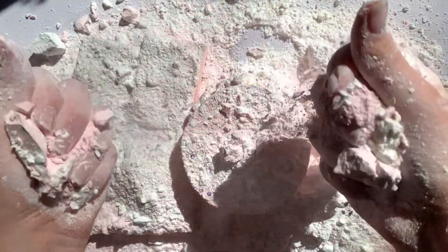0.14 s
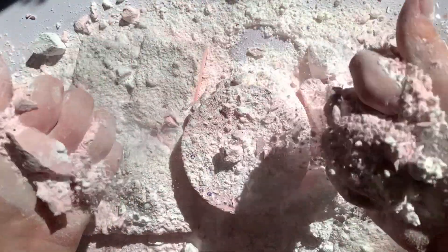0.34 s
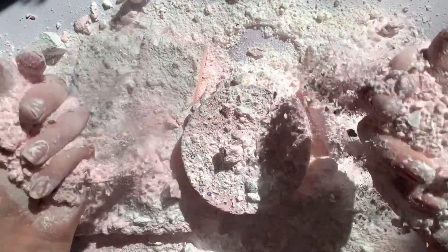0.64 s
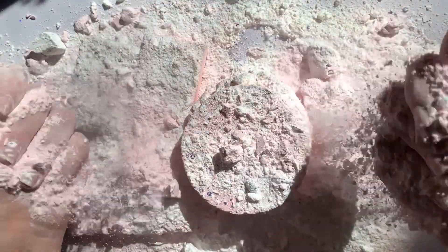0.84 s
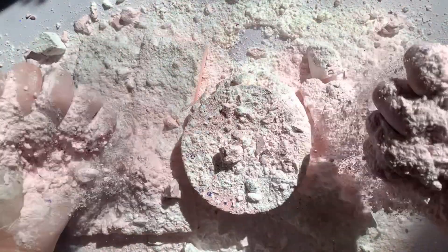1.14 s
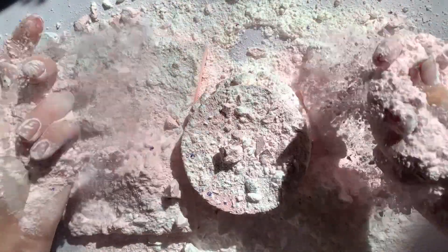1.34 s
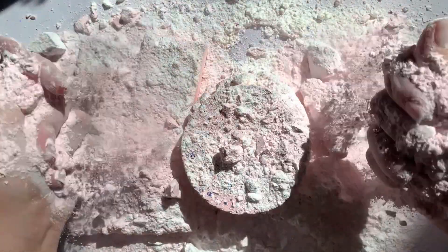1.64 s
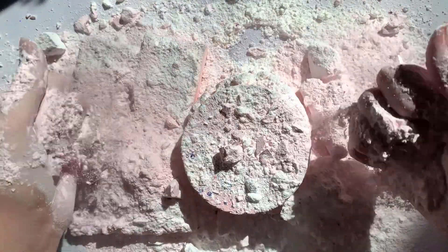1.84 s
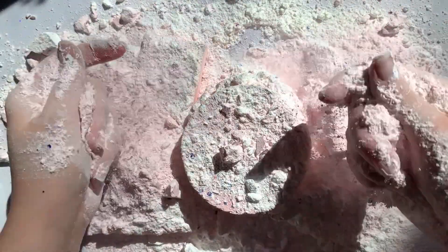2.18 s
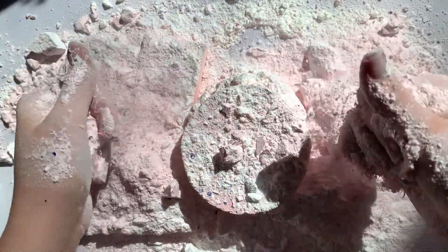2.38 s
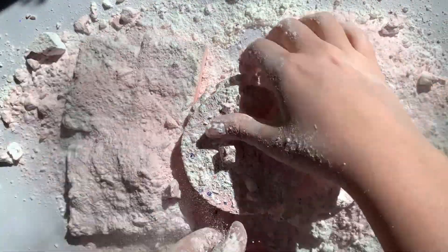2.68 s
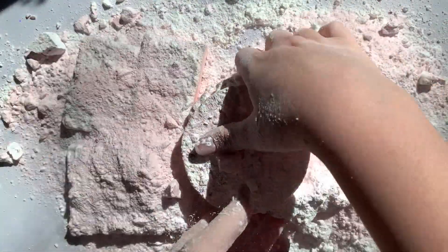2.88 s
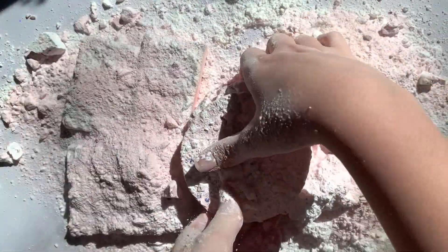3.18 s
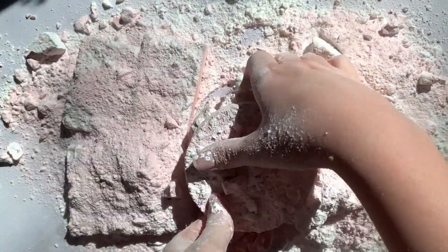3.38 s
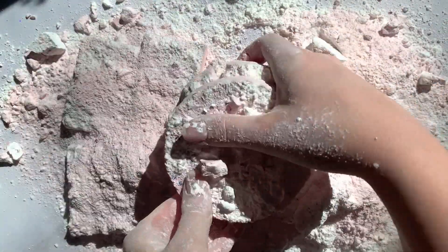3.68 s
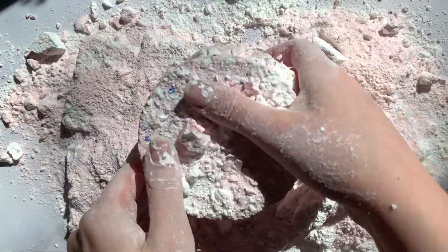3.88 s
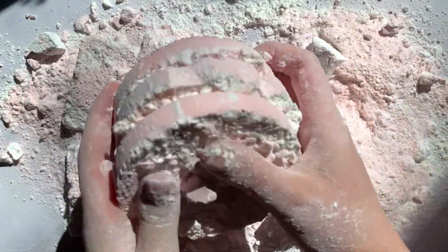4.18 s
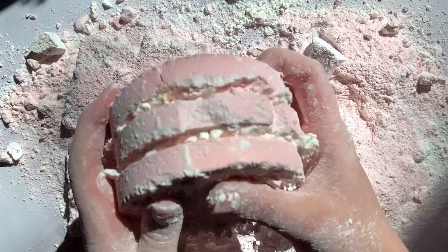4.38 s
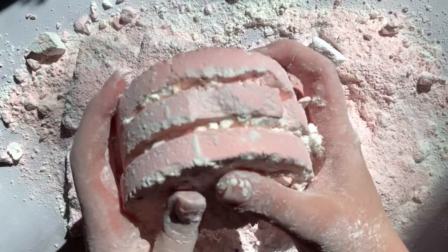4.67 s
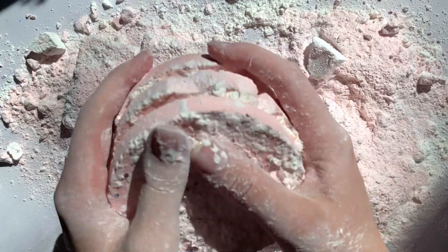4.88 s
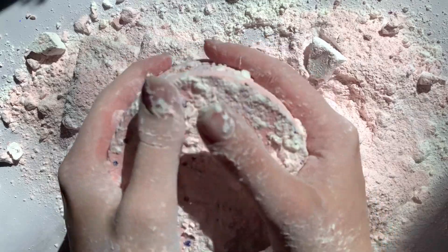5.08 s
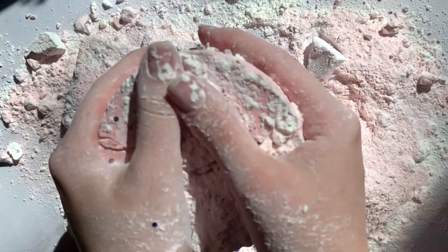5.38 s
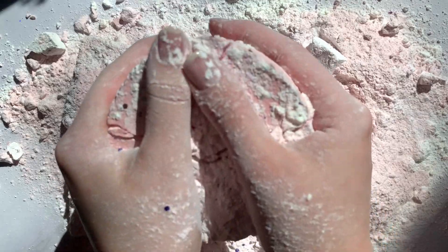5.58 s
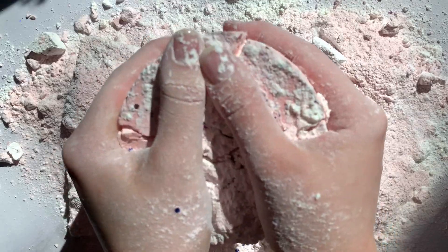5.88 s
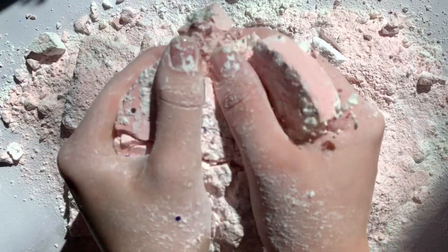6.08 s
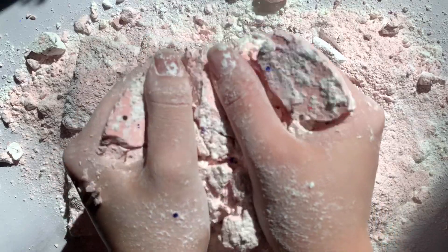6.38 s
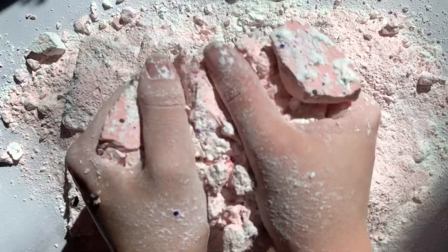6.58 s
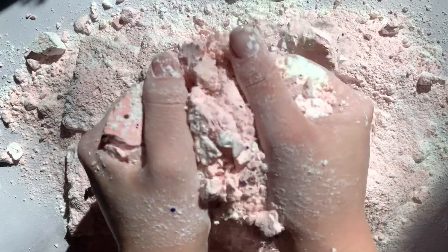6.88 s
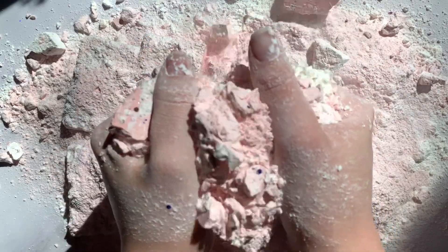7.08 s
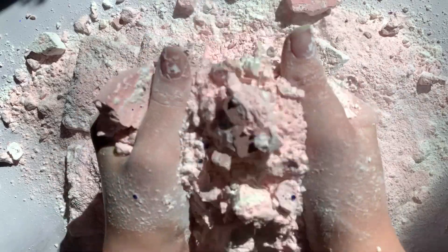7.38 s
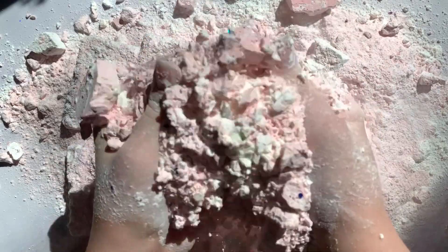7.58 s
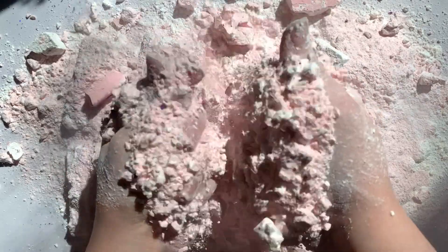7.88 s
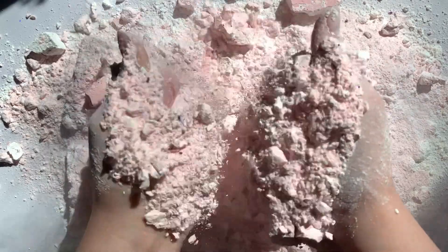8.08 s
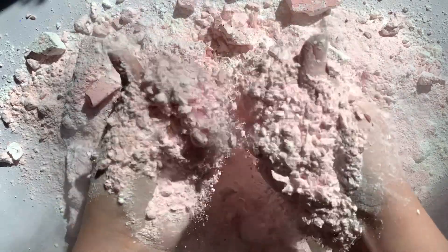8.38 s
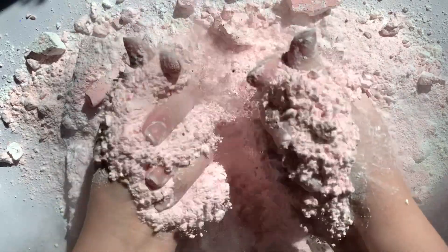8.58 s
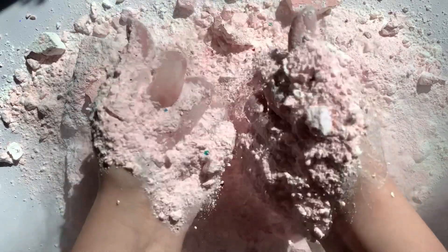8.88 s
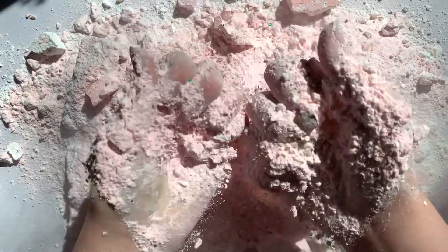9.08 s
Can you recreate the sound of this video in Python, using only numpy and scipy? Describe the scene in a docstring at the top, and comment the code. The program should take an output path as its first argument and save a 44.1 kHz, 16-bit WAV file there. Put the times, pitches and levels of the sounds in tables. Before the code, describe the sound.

Very close stereo sound of hands crushing dry chalk indoors. Sharp brittle cracks and gritty crumbling come first and thin out within two seconds. Fingers brush softly through powder with a few small clicks. Then a block gives way in rapid, dense snapping and crunching, loosening into duller lumps and crumbs before nearly stopping. Faint low ventilation rumble, hum and hiss lie underneath.

```python
"""Sharp cracks and crumbling chalk come first, kneaded by two hands close under a phone with two microphone ports.
Fingers then brush the dust, and a long hard crush into grit and powder thins out towards the end.
Cracks are swelling noise bursts with short ringing modes; crumbling and brushing are coloured grainy noise;
lumps and small pops are damped sines. The heap groans low, over room rumble, wavering hum lines and hiss.
Table levels are set at the source, ahead of the ports, the echoes and the phone's own response."""
import sys
import numpy as np
from scipy import signal
from scipy.fft import rfft, irfft, next_fast_len
from scipy.io import wavfile
from scipy.ndimage import uniform_filter1d, map_coordinates

SR = 44100
rng = np.random.default_rng(int(sys.argv[2]) if len(sys.argv) > 2 else 0)


def int16_out(signal):
    """Quantize to a 16-bit WAV file."""
    q = np.round(np.clip(np.atleast_2d(signal).T, -1, 1) * 32767)
    wavfile.write(sys.argv[1], SR, q.astype(np.int16))


N = 407466


def amp(db):
    """dB to gain."""
    return 10 ** (np.asarray(db) / 20)


def unit(x):
    """Scaled to rms 1."""
    return x / np.sqrt(np.mean(x ** 2) + 1e-20)


def along(points, hz):
    """Read (frequency, value) points on a log frequency axis."""
    f, v = np.transpose(points)
    return np.interp(np.log(hz + 1), np.log(f + 1), v)


def curves(rows):
    """One value per sample for each column after the time."""
    s, *cols = np.transpose(rows)
    return [np.interp(np.arange(N) / SR, s, c) for c in cols]


def wobble(rate):
    """A smooth random curve of rms 1, with rate knots a second."""
    knots = rng.standard_normal(int(N * rate / SR) + 4)
    return unit(map_coordinates(knots, [np.arange(N) * rate / SR]))


def filtered(x, response):
    """x times a complex response of frequency."""
    m = next_fast_len(N + 8192)
    return irfft(rfft(x, m) * response(np.fft.rfftfreq(m, 1 / SR)), m)[..., :N]


def coloured(envelope, spectrum, patchy_db=0):
    """Two unrelated noises under one envelope; patches of gain give each moment its own shade of the colour."""
    z = signal.stft(rng.standard_normal((2, N)), nperseg=256)[2]
    field = rng.standard_normal(z.shape[1:])
    for axis in (0, 1):
        field = uniform_filter1d(field, size=3, axis=axis)
    patched = z * amp(patchy_db * unit(field))
    pair = unit(signal.istft(patched, nperseg=256)[1][:, :N])
    # the colour shapes the noise; its mean power over the band is divided out
    norm = np.sqrt(np.mean(amp(along(spectrum, np.linspace(0, SR / 2, 4000))) ** 2))
    return filtered(envelope * pair, lambda hz: amp(along(spectrum, hz)) / norm)


def burst(t, rise, t60):
    """A quick swell that dies away; rise and t60 share the unit of t."""
    return (1 - np.exp(-t / rise)) * amp(-60 * t / t60)


def crumbs(count, rise, t60, spread_db):
    """The envelope of many small random fractures, a few of them larger."""
    draw = rng.random((count, 2))
    # stress builds up again after each break, so gaps are fairly even
    when = (np.arange(count) + draw[:, 0]) / count
    size = amp(-spread_db * np.log(1 - draw[:, 1]))
    train = np.bincount((when * N).astype(int), size, N)
    return unit(signal.fftconvolve(train, burst(np.arange(2000) / SR, rise, t60))[:N])


# Colour of the ventilation rumble: (frequency [Hz], level [dB])
RUMBLE_COLOUR = [(12, -51), (20, -43), (40, -5), (59, 1.5), (92, -6), (205, -7), (293, -22.5), (401, -24.5),
                 (445, -23.5), (474, -24.5), (516, -32), (871, -35), (1930, -65), (3000, -72.5),
                 (3900, -64), (6600, -120)]
# Colour of the microphone hiss: (frequency [Hz], level [dB])
HISS_COLOUR = [(1500, -45), (3000, -38), (6000, -12), (8500, -26), (11500, 1), (14000, 12), (15500, 9),
               (17000, -37)]
# Wavering hum lines of the room: (frequency [Hz], width [Hz], level [dB])
HUM_LINES = [(60.3, 7.3, -65.5), (120.2, 8, -61), (203.4, 7.1, -72)]


def room():
    """Low ventilation rumble with a few wavering lines of narrow noise, and the hiss of the microphones."""
    sound = coloured(amp(-54.0 + wobble(2.28)), RUMBLE_COLOUR)
    sound = sound + coloured(amp(-72.5 + 1.5 * wobble(5)), HISS_COLOUR)
    for hz, width, db in HUM_LINES:
        line = filtered(rng.standard_normal((2, N)), lambda f: np.exp(-((f - hz) / width) ** 2))
        sound = sound + amp(db) * unit(line)
    return sound


# Force of the hands, also played by pops() and crumbling():
# (time [s], crumbling lumps level [dB], grit level [dB], graininess [dB])
HAND_FORCE = [(0.0, -57, -53.5, -22), (0.37, -61, -55, -6), (0.6, -55.5, -53.5, 4), (0.68, -51, -48.5, -1),
              (0.77, -54.5, -54.5, 1), (0.83, -60, -58.5, -3), (0.99, -66.5, -66, 0),
              (1.015, -59, -49.5, 7), (1.06, -62, -58, 0), (1.12, -62.5, -60, -3), (1.33, -63.5, -62, -9),
              (1.55, -62.5, -57, -11), (1.75, -69, -82, 3), (1.85, -84.5, -75, -9), (5.1, -91, -84.5, 1),
              (5.27, -60, -72, 7), (5.34, -69, -52, 23), (5.42, -55, -46, 11), (5.52, -66, -56, 5),
              (5.7, -65, -50.5, 17), (5.79, -59, -50, 16), (5.84, -54, -37, 8), (5.9, -67, -55, 15),
              (5.97, -56, -36.5, 2), (6.07, -48, -37.5, 7), (6.11, -54, -45, 4), (6.17, -38, -36, 3),
              (6.21, -54, -46.5, 9), (6.27, -38.5, -38, 13.5), (6.33, -44.5, -38.5, 4),
              (6.48, -44.5, -43, -1), (6.54, -41.5, -36, 4), (6.62, -44.5, -41, 2), (6.82, -42.5, -43, 10),
              (6.9, -44.5, -43.5, 5), (6.93, -43, -40, 1), (6.98, -46.5, -45.5, -9), (7.03, -42, -45.5, -3),
              (7.15, -44.5, -45.5, 3.5), (7.24, -47, -50.5, 0.5), (7.45, -43, -48.5, -10),
              (7.6, -45.5, -51, 0), (7.69, -55.5, -63, 11.5), (7.75, -41, -50, -5), (7.83, -51, -54, 4),
              (7.9, -45.5, -47.5, -2), (8.05, -45.5, -47, 1), (8.15, -54, -54.5, 2), (8.28, -51.5, -58, -1),
              (8.4, -65.5, -63.5, 8), (8.55, -55.5, -58, -8), (8.67, -48, -57, -7), (8.85, -51, -62.5, 2),
              (9.0, -56.5, -65, -10), (9.14, -60.5, -66, 6), (9.17, -66, -68, -6), (9.24, -71, -70, -3)]
# Colour of the groaning heap: (frequency [Hz], level [dB])
HEAP_COLOUR = [(30, -70), (70, -12.5), (120, -10), (200, -1.5), (350, -15.5), (700, -29), (1500, -68)]
HARD_DB = -42  # crumbling at full force
HEAP_DB, HEAP_FOLLOWS = -49, 0.78  # groan at full force [dB]; change per dB of crumbling


def pressing():
    """The packed heap shifts in low irregular jolts, the louder the harder the chalk is crumbled."""
    lumps_db, grit_db, _ = curves(HAND_FORCE)
    force_db = (lumps_db + grit_db) / 2 - HARD_DB
    return coloured(amp(HEAP_DB + HEAP_FOLLOWS * force_db + 4.0 * wobble(30)), HEAP_COLOUR)


# Fingers brushing over powder, powder sifting down:
# (time [s], length [s], grit level [dB], lumps over grit [dB], dust over grit [dB])
FINGER_RUBS = [(0.01, 0.29, -74.5, -12, 13), (1.625, 0.11, -72, 3, 3), (1.749, 0.082, -68.5, -10, 5),
               (1.848, 0.062, -77, 3, 10), (1.945, 0.078, -69, -25, 11.5), (2.026, 0.12, -76, 3, -2),
               (2.155, 0.049, -65, 2.5, 2.5), (2.218, 0.18, -79.5, 4.5, 2), (2.31, 0.12, -68.5, -25, 5),
               (2.51, 0.098, -69, 4, 0.5), (2.627, 0.17, -59, -6.5, -2), (2.73, 0.094, -59.5, -17, 8),
               (2.835, 0.17, -59, -4, -2.5), (2.985, 0.058, -77.5, 17, 10), (3.215, 0.12, -69.5, 4.5, 2),
               (3.354, 0.053, -60.5, 1.5, -3), (3.405, 0.075, -76.5, 9, -22), (3.503, 0.027, -70, 11, 16.5),
               (3.531, 0.081, -86.5, 19.5, 3), (3.66, 0.12, -80, 9.5, 2), (3.794, 0.12, -77, 10.5, 3),
               (3.897, 0.079, -74.5, 0, 11.5), (3.976, 0.065, -77, 6.5, -1), (4.053, 0.053, -78, 3, 7),
               (4.178, 0.046, -71, -1, -1), (4.266, 0.088, -77, 5, 4), (4.34, 0.053, -69.5, 1, 16),
               (4.419, 0.11, -54.5, -4, -2.5), (4.544, 0.066, -71, 1, -6), (4.681, 0.25, -68.5, -6, 14),
               (4.862, 0.13, -67, -1, 9.5), (5, 0.13, -70.5, 3.5, 5)]
RUB_ATTACK_S, RUB_RELEASE_S = 0.022, 0.028  # time for 20 dB of fade at each end
RUB_SAG_DB, RUB_UNEVEN_DB = 2.5, 2.5  # weaker at its ends than in the middle; uneven finger pressure


def rubbing():
    """Power of lumps, grit and dust stirred by each brush of the fingers: it swells, holds and fades."""
    t, power = np.arange(N) / SR, np.zeros((3, N))
    for s, length, db, coarse_db, fine_db in FINGER_RUBS:
        near = slice(max(round((s - .1) * SR), 0), round((s + length + .2) * SR))
        before = (s - t[near]) / RUB_ATTACK_S
        after = (t[near] - s - length) / RUB_RELEASE_S
        fade_db = -20 * np.maximum(0, np.maximum(before, after))
        across = np.clip(2 * (t[near] - s) / length - 1, -1, 1)  # -1 to 1 through the brush
        fade_db -= RUB_SAG_DB * (across ** 2 - .5)
        sizes_db = np.array([[coarse_db], [0], [fine_db]])
        power[:, near] += amp(db + sizes_db + fade_db) ** 2
    pressure = np.array([wobble(24.72), wobble(24.95), wobble(24.97)])
    return power * amp(2 * RUB_UNEVEN_DB * pressure)


# Lumps landing or breaking off, and, near 5.3 s, brief 2.2 kHz rings of the cracking block: (time [s], level
# [dB], pitch [Hz])
LUMP_THUDS = [(0.487, -40, 797), (0.503, -36, 197), (0.503, -28.5, 746), (0.525, -37, 610),
              (0.534, -30, 814), (0.572, -36, 208), (0.606, -34, 1430), (0.654, -32, 1000),
              (0.755, -31, 805), (0.828, -26, 3900), (0.9, -43.5, 1050), (1.012, -21.5, 2700),
              (1.234, -38, 820), (1.367, -34.5, 636), (1.674, -33.5, 495), (1.674, -39, 770),
              (2.549, -47, 850), (2.625, -44, 646), (2.633, -33, 5800), (2.665, -22, 6100),
              (2.707, -32, 173), (2.71, -38, 397), (2.942, -46, 807), (2.992, -43, 756), (3.04, -48, 423),
              (3.523, -42, 904), (3.699, -53, 1140), (3.818, -38.5, 804), (4.336, -39, 238),
              (4.416, -39.5, 730), (4.442, -36, 920), (4.448, -33.5, 1190), (4.455, -32, 174),
              (4.479, -41, 746), (4.686, -47.5, 480), (5.293, -34, 2200), (5.323, -31, 2200),
              (5.329, -32, 2200), (5.339, -29, 2250), (5.348, -32, 2190), (5.364, -26, 2240),
              (5.435, -31, 2240), (5.555, -29, 1250), (5.391, -39, 250), (5.449, -27, 700),
              (5.654, -38, 241), (5.756, -30.5, 655), (6.034, -24, 1050), (6.321, -30, 1000),
              (6.393, -30, 210), (6.399, -24.5, 1090), (6.418, -27, 1240), (6.524, -30, 188),
              (6.538, -30, 190), (6.586, -42, 180), (6.661, -29, 170), (6.452, -32, 690),
              (6.581, -25, 1310), (6.639, -24, 1260), (6.655, -26, 630), (6.697, -28, 990),
              (6.735, -24, 880), (6.813, -26, 744), (6.85, -28, 1300), (6.875, -27, 183), (6.918, -25, 905),
              (6.924, -34, 1500), (6.931, -25, 620), (6.937, -28.5, 310), (6.942, -30, 169),
              (7.023, -33, 217), (7.163, -29, 790), (7.743, -19.5, 230), (7.762, -28, 173),
              (7.85, -17, 2400), (8.558, -39, 404), (8.588, -39, 1090), (8.588, -28.5, 2370),
              (8.633, -41, 860), (8.65, -30, 810), (8.668, -35, 1010), (8.848, -37, 1220),
              (8.879, -39, 1160), (8.967, -38, 1260), (9.046, -45, 1200), (9.143, -53, 633),
              (9.198, -42, 150)]
THUD_T60, THUD_DAMPING = 0.039, 0.62  # [s] at 200 Hz; how much faster higher lumps die
THUD_RISE_CYCLES = 0.26  # soft contact


def thuds():
    """A soft lump gives a few damped cycles and a shorter overtone, nearly alike at both ports."""
    out, t = np.zeros(N + SR), np.arange(SR // 8) / SR
    for s, db, hz in LUMP_THUDS:
        t60 = THUD_T60 * (200 / hz) ** THUD_DAMPING
        tone = burst(t, THUD_RISE_CYCLES / hz, t60) * np.sin(2 * np.pi * hz * t)
        overtone = amp(5.5) * burst(t, 0.003, 0.22 * t60) * np.sin(2 * np.pi * 2.66 * hz * t)
        out[round(s * SR):][:len(t)] += amp(db) * (tone + overtone)
    trimmed = filtered(out[:N], lambda f: f ** 2 / (f ** 2 + 70 ** 2))  # little left below 70 Hz
    return trimmed * np.array([[1], [.3]])  # common and differing part


POPS, POP_HZ, POP_SPREAD = 6000, 1220, 0.34  # how many, median pitch [Hz], its log spread
POP_CYCLES, POP_SIZES_DB = 7, 2.6  # cycles to fall 60 dB; spread of sizes
POP_DB = -5.5  # under the crumbling lumps


def pops():
    """Small lumps give way one by one, each with a few cycles at its own pitch and from its own spot."""
    draw, pitch = rng.random((POPS, 3)), rng.standard_normal(POPS)
    hz = np.clip(POP_HZ * np.exp(POP_SPREAD * pitch), 300, 5000)[:, None]
    cycles = hz * np.arange(512) / SR
    size = amp(-POP_SIZES_DB * np.log(1 - draw[:, 1:2]))
    rows = size * burst(cycles, 0.94, POP_CYCLES) * np.sin(2 * np.pi * cycles)
    where = ((draw[:, :1] * N).astype(int) + np.arange(512)).ravel()
    spot = 1.67 * (draw[:, 2:] - .5)  # angle between common and differing part [rad]
    pair = [np.bincount(where, (rows * part).ravel(), N)[:N] for part in (np.cos(spot), np.sin(spot))]
    return amp(POP_DB + curves(HAND_FORCE)[0]) * unit(np.array(pair))


# Colours of the grain sizes, each (frequency [Hz], level [dB]):
# crumbling lumps, grit, fine dust (also in cracks()), and grit brushed by the fingers
LUMP_COLOUR = [(120, -20), (300, -13.5), (450, -2.5), (750, -1), (930, -4.5), (1150, -2), (1350, -4),
               (1600, -2.5), (1900, -3.5), (2200, -9), (2600, -10), (4000, -20), (7000, -56)]
GRIT_COLOUR = [(800, -82), (2000, 2.5), (3000, 2.5), (5000, -2.5), (7000, -2.5), (8500, -8), (11000, -45)]
DUST_COLOUR = [(5000, -15.5), (8000, -5.5), (9500, 1.5), (11500, -6), (13000, -2.5), (14200, 3.5),
               (15500, -7.5), (17000, -51)]
POWDER_COLOUR = [(800, -40), (1500, -15), (2650, -6), (4180, -3.5), (5030, -5.5), (6000, -4), (7600, -6),
                 (8500, -32), (11000, -42)]
DUST_DB = -3.5  # fine dust raised by crumbling, relative to the grit
GRIND_DB, GRIND_RATE = 0.5, 68  # stutter depth [dB rms], knots a second


def crumbling():
    """Chalk gives way in short fractures over a smooth powder rustle; graininess is their level over it."""
    lumps_db, grit_db, grainy_db = curves(HAND_FORCE)
    brushed = rubbing()
    crushed = amp([lumps_db, grit_db, grit_db + DUST_DB])
    # brushed lumps and dust join the crushed ones; brushed grit has its own stream
    levels = np.sqrt(crushed ** 2 + brushed * np.array([[1], [0], [1]]))
    shared = crumbs(count=800, rise=0.0003, t60=0.027, spread_db=2.5)
    grind = amp(GRIND_DB * wobble(GRIND_RATE))  # all sizes stutter together as the mass slips

    def stream(level, own, extra_db):
        """The envelope of one grain size, its swing levelled by a running rms."""
        powder = grind * amp(1.5 * wobble(35))
        swing = powder + amp(grainy_db + extra_db) * (shared + own)
        return level * swing / np.sqrt(np.abs(uniform_filter1d(swing ** 2, size=8000)))

    lump_breaks = 1.15 * crumbs(count=1500, rise=0.0012, t60=0.026, spread_db=2.6)
    lumps = stream(levels[0], lump_breaks, extra_db=-7)
    grit_breaks = 0.58 * crumbs(count=2500, rise=0.00025, t60=0.0039, spread_db=1.5)
    grit = stream(levels[1], grit_breaks, extra_db=-6)
    dust_breaks = 0.93 * crumbs(count=2500, rise=0.00025, t60=0.003, spread_db=3.0)
    dust = stream(levels[2], dust_breaks, extra_db=-2.5)
    sifted_grains = 0.6 * crumbs(count=1500, rise=0.00023, t60=0.0032, spread_db=5.0)
    sifted = stream(np.sqrt(brushed[1]), sifted_grains, extra_db=-5)

    sound = coloured(sifted, POWDER_COLOUR, patchy_db=3.0)
    sound = sound + coloured(lumps, LUMP_COLOUR, patchy_db=1)
    sound = sound + coloured(grit, GRIT_COLOUR, patchy_db=2.0)
    return sound + coloured(dust, DUST_COLOUR, patchy_db=2.5)


# Cracks of the blocks, also played by cracks():
# (time [s], reference level [dB], body over it [dB], treble over it [dB], nominal length [ms])
CRACK_EVENTS = [(0.039, -27, -25, -5, 2.1), (0.147, -25.5, -40, -7, 1.15), (0.399, -33.5, -6, -23, 1.7),
                (0.4134, -16.5, -20, -12, 1.85), (0.453, -32.5, -10.5, -8, 1.8),
                (0.502, -32, -16, -3.5, 2.7), (0.532, -25.5, -21, -29, 2.8), (0.605, -31, -12.5, -13, 3.7),
                (0.627, -31.5, -10, -15, 2.4), (0.653, -31.5, -9, -2.5, 2.7), (0.674, -17, -18, -22, 2),
                (0.698, -29, -29, -6.5, 1.8), (0.725, -32.5, -13, -3, 1.4), (0.811, -32, -21, -17, 3),
                (0.8279, -18.5, -21, -20.5, 1.4), (0.842, -34, -29, -28, 2.1), (0.9, -36.5, -14, -27, 1.9),
                (0.981, -31.5, -24, -26, 2.4), (1.0118, -18.5, -23.5, -25, 1.65),
                (1.027, -32, -24, -27, 2.3), (1.084, -36, -15.5, -33, 3.9), (1.132, -33, -13, -35, 1.6),
                (1.155, -32, -29, -22, 3), (1.196, -24, -26, -18, 1.3), (1.213, -36.5, -27, -10, 2.1),
                (1.242, -33, -26, -25, 1.8), (1.347, -33.5, -32, -26, 1.5), (1.391, -22.5, -18, -23.5, 1.6),
                (1.4274, -18.5, -19.5, -19, 1.5), (1.519, -26.5, -15.5, -19, 2.8),
                (2.157, -39, -5.5, 2.5, 0.73), (2.631, -36.5, -16, -11, 2.9), (2.645, -50, -25, 3, 1.2),
                (2.664, -25.5, -40, -10.5, 1.7), (2.687, -41.5, -21, 1, 2.2), (2.719, -47, -10, 6, 1.4),
                (2.733, -47.5, -11, 9, 3.2), (2.777, -49, -15, 10, 2), (2.865, -45.5, -38, -1, 2.8),
                (3.59, -59.5, 14.5, -35, 0.7), (3.82, -49, -9, -22, 2.6), (4.335, -42, -13.5, -7, 4),
                (4.373, -49, -31, 7, 1.3), (4.39, -44, -20, 0, 1.5), (4.415, -43, -10, -7, 1.8),
                (4.448, -39.5, -6, 0.5, 1.8), (4.461, -27.5, -16.5, -10.5, 2.5), (4.488, -42, -25, -5, 1.1),
                (4.499, -38, -32, -9, 1.1), (4.52, -33, -18, -2, 0.94), (5.207, -48.5, -8, -12, 2.6),
                (5.294, -34.5, -11, -22, 3.6), (5.322, -30, -14, -24, 4.4), (5.337, -30, -18, -12, 3.5),
                (5.347, -30, -25, -18, 6.4), (5.363, -27.5, -23, -11, 3.5), (5.396, -23, -15.5, -9.5, 1.7),
                (5.416, -39, -18, -8, 1.5), (5.426, -38, -18, -8, 1.5), (5.4345, -20.5, -19, -3, 1),
                (5.446, -19.5, -28, -13.5, 4.9), (5.485, -29, -16, -13, 2.7), (5.502, -34, -11, -13, 2.5),
                (5.534, -21.5, -16.5, -19, 1.5), (5.541, -33, -22, -8, 1.2),
                (5.5534, -19.5, -19.5, -8, 3.5), (5.58, -22, -26, -15, 2.8),
                (5.5941, -22.5, -16.5, -11, 4.5), (5.62, -17.5, -23.5, -16.5, 2.2),
                (5.636, -19, -26, -21, 2.5), (5.6549, -17.5, -16, -8.5, 2.4), (5.689, -16, -21.5, -16, 2),
                (5.716, -16.5, -25, -21, 2.2), (5.729, -14.5, -16, -10, 2.9), (5.755, -17, -19.5, -8, 2.6),
                (5.769, -21.5, -25, -12, 2.5), (5.78, -25, -19, -18, 1.7), (5.803, -14, -21, -12.5, 2.5),
                (5.816, -21, -15.5, -11, 3.9), (5.831, -18.5, -22, -11, 4.7), (5.844, -24.5, -16, -14, 3.9),
                (5.857, -21, -25, -24, 4.6), (5.875, -18.5, -14.5, -5, 1.6), (5.883, -23, -16, -9.5, 3.1),
                (5.909, -15.5, -21.5, -12.5, 2.6), (5.923, -19, -17, -11, 2.1), (5.939, -24, -17, -13, 2),
                (5.947, -19, -18, -10, 5.1), (5.971, -12.5, -15, -11, 1.1), (5.983, -15.5, -14, -11, 1.9),
                (5.994, -20, -13.5, -8.5, 4), (6.011, -23, -10, -12, 2), (6.025, -21, -12, -3, 2),
                (6.037, -20, -10, -9, 3), (6.054, -20.5, -11, -4.5, 3.5), (6.0646, -18, -15, -5.5, 1.4),
                (6.075, -23, -19, -8, 3.2), (6.088, -26, -10, -12, 1.9), (6.102, -28.5, -5, -20, 1.2),
                (6.132, -24, -15, -13, 1.9), (6.144, -20, -15.5, -14, 1.9), (6.155, -24, -23, -5, 1.7),
                (6.17, -21, -27, -10, 2.3), (6.203, -26, -12, -15, 1.8), (6.223, -18.5, -14, -12, 2.8),
                (6.239, -23, -8, -10, 2.2), (6.256, -22.5, -17, -9.5, 2.4), (6.28, -28, -20, -14, 4.6),
                (6.3116, -21, -14, -14, 1.5), (6.336, -19, -12, -14, 1.6), (6.353, -17, -13, -16, 2.1),
                (6.374, -17, -18, -19, 2.9), (6.397, -18, -18, -15, 4.1), (6.432, -20.5, -17, -9.5, 2),
                (6.454, -16.5, -9.5, -16, 1.3), (6.474, -18, -22, -14, 1.3), (6.495, -21.5, -14, -16, 2.9),
                (6.518, -24, -11, -11, 2.6), (6.529, -25, -11, -7, 3), (6.579, -33, -17, -17, 1.4),
                (6.591, -25, -7, -9, 1.6), (6.601, -29, -7.5, -13, 2.2), (6.61, -23, -10, -14, 2.1),
                (6.638, -30, -11, -7, 2.5), (6.652, -27, -10, -9, 2.3), (6.674, -23.5, -8, -11, 1.6),
                (6.696, -26.5, -8, -7, 1.2), (6.715, -25.5, -2, -5, 1.4), (6.726, -25.5, -1, -14, 1.8),
                (6.737, -27, -4, -8, 2.6), (6.759, -30, -14, -1, 1.6), (6.799, -32, -13, -11, 1.9),
                (6.813, -30, -8, -7, 1.3), (6.843, -32.5, -5, 0, 2.2), (6.876, -30, -5, -0.5, 1.1),
                (6.898, -32.5, -2, -5, 2.1), (6.922, -24, -3, -14, 2.4), (6.932, -23, -13, -12, 3.2),
                (6.961, -28, -10, -10, 1.6), (6.988, -26.5, -9.5, -13, 2), (7.004, -29.5, 1, -3, 1.7),
                (7.026, -29.5, -7, -7, 3.2), (7.046, -29.5, -11, -2.5, 1.7), (7.066, -26.5, -6.5, -7.5, 2),
                (7.084, -33, -15, -3.5, 2.2), (7.1, -34, -11, -2, 1.9), (7.117, -33, -1, 0, 1.4),
                (7.167, -27.5, 0, -3, 0.74), (7.187, -34.5, -2, -2.5, 1.6), (7.233, -32, -6, -6, 1.8),
                (7.261, -36.5, -1, -5, 2.6), (7.283, -37, -7, 0, 1.2), (7.306, -32, -13, -12, 2.6),
                (7.331, -40, 1, -5, 1.6), (7.352, -40, 3, -22, 3.3), (7.712, -48, -14, 2, 1.9),
                (7.721, -43, 2.5, -6, 1.9), (7.761, -39.5, 2, -5, 2.1), (7.833, -30, -8, -22, 1.2),
                (7.848, -19, -12.5, -39, 2.8), (7.871, -28, -11, -19, 2), (7.889, -33, -11, -20, 2.4),
                (7.993, -24, -12, -17, 1.3), (8.004, -30, -9, -21, 2.8), (8.018, -25, -9, -28, 1.7),
                (8.034, -27, -9, -26, 1.8), (8.052, -24, -13, -7, 0.96), (8.069, -29.5, -5, -17, 0.8),
                (8.086, -24, -10, -10.5, 0.61), (8.104, -33, -10, -8, 1.2), (8.13, -31.5, -8, -7, 1.4),
                (8.168, -38, -4, -11, 1.7), (8.199, -45, 3, -20, 1.6), (8.531, -42.5, -11, 1, 0.54),
                (8.588, -26, -9.5, -27, 1.1), (8.619, -36, -9, -10, 1.7), (8.649, -39, -18, -7, 2),
                (8.691, -45, -7, -23, 1.9)]
# Modes of a cracking piece: (frequency [Hz], level relative to the crack [dB] or,
# above RING_SPLIT_HZ, to its treble [dB], t60 before scaling by crack length [s])
RING_MODES = [(1180, -26, 0.014), (2350, -19.5, .012), (3630, -16, 0.0099), (4270, -32, 0.0051),
              (6400, -9, 0.0056), (7300, -9, .006)]
RING_SPLIT_HZ = 5000
RING_PITCH_SPREAD, RING_SPREAD_DB = .06, 3.5  # every piece differs a little


def ringing():
    """The piece that cracks rings briefly in a few modes, longer for a longer break."""
    out, t = np.zeros(N + SR), np.arange(SR // 30) / SR
    hz, level_db, t60 = np.transpose(RING_MODES)[:, :, None]
    draw = rng.standard_normal((len(CRACK_EVENTS), 3, len(RING_MODES), 1))
    for (s, db, _, treble_db, ms), (pitch, strength, phase) in zip(CRACK_EVENTS, draw):
        gain = amp(db + level_db + RING_SPREAD_DB * strength + treble_db * (hz > RING_SPLIT_HZ))
        rise = max(ms, .3) / 1000
        swell = (1 - np.exp(-t / rise)) * burst(t, rise, t60 * (0.49 + 0.28 * ms))
        turns = hz * (1 + RING_PITCH_SPREAD * pitch) * t + phase
        modes = gain * swell * np.sin(2 * np.pi * turns)
        out[round(s * SR):][:len(t)] += np.sum(modes, axis=0)
    return out[:N] * np.array([[1], [.3]])  # common and differing part


# Colours of a crack, each (frequency [Hz], level [dB]): mid chips, treble flakes, body of the piece
CHIP_COLOUR = [(1000, -37), (2000, -3.5), (3000, -0.5), (4500, -4.5), (7000, -26.5)]
FLAKE_COLOUR = [(2500, -48), (4500, -9), (6500, -3), (8500, -2), (11000, -11.5)]
BODY_COLOUR = [(200, -13.5), (500, -7), (1000, -1.5), (1600, -0.5), (2400, -7.5), (4000, -39)]
CHIP_DB, PUFF_DB = -13.5, -7  # mid chips relative to the crack; dust puff relative to its treble
SHED_DB, SHED_T60 = -37, .025  # crumbs that trail every crack: level under each part, decay [s]


def cracks():
    """Each crack is milliseconds of splintering that swells and dies, its body a little longer; crumbs trail it."""
    tracks = np.zeros((4, N + SR))  # chip, flake, body, dust
    t = np.arange(SR // 20) / SR
    shed = amp(SHED_DB) * burst(t, 0.0093, SHED_T60)
    for s, db, body_db, treble_db, ms in CRACK_EVENTS:
        u = 1000 * t / (max(ms, .3) * np.array([[.7], [.7], [.9], [.8]]))
        swell = (u * np.exp(1 - u)) ** 1.4
        parts_db = np.array([[CHIP_DB], [treble_db], [body_db], [PUFF_DB + treble_db]])
        tracks[:, round(s * SR):][:, :len(t)] += amp(db + parts_db) * (swell + shed)
    splinters = amp(4.7 * wobble(2000))  # a crack is a chain of smaller breaks
    splinters = splinters / np.sqrt(np.abs(uniform_filter1d(splinters ** 2, size=130)))
    chip, flake, body, dust = tracks[:, :N]
    sound = coloured(chip * splinters, CHIP_COLOUR, patchy_db=2.5)
    sound = sound + coloured(flake * splinters, FLAKE_COLOUR, patchy_db=1.5)
    sound = sound + coloured(dust * splinters, DUST_COLOUR, patchy_db=3)
    return sound + coloured(body, BODY_COLOUR)


# Likeness of the two microphone ports: (frequency [Hz], likeness [0 to 1])
PORT_LIKENESS = [(40, 0.66), (150, 0.93), (400, 0.43), (1000, 0.34), (3000, 0.52), (5000, 0.11),
                 (6300, 0.7), (8500, 1), (15000, 0.84)]
# Phase by which the left port leads: (frequency [Hz], lead [rad])
PORT_LEAD = [(0, 0), (1000, .5), (1720, 2.4), (3100, 3.3), (4500, 5.8), (5200, 9), (6200, 6.2),
             (16000, -6.3)]
# Level gap of the ports, scaled by each source's tilt: (frequency [Hz], left minus right [dB])
PORT_TILT = [(60, -5), (92, -2), (140, 6.5), (210, -6.5), (330, 2), (500, 14.5), (770, 3), (1170, 10),
             (1790, 4), (2740, 2.5), (4190, -3), (6410, -2), (9810, 1.5), (15000, -0.5)]


def ports(pair, tilt):
    """A common and a differing part make left and right; the ports differ in phase and level."""
    def turn(hz):
        """Shares of the common and differing part."""
        u = np.arccos(np.clip(along(PORT_LIKENESS, hz), -1, 1)) / 2
        return np.array([np.cos(u), np.sin(u)])

    def place(hz):
        """Half of the level and phase gap on each side."""
        lead = np.interp(hz, *np.transpose(PORT_LEAD))
        half = amp(tilt * along(PORT_TILT, hz) / 2) * np.exp(.5j * lead)
        return np.array([half, 1 / half])

    mid, side = filtered(pair, turn)
    return filtered(np.array([mid + side, mid - side]), place)


# Echoes of hands and desk: (delay [s], left level [dB], right level [dB])
DESK_ECHOES = [(.0009, -20.5, -65), (.0027, -24, -15.5)]


def echoed(x):
    """A few weak copies arrive a moment later, differently at each port, then the short tail of the room."""
    def reflections(hz):
        """The direct sound plus its delayed copies."""
        return 1 + sum(amp([[left_db], [right_db]]) * np.exp(-2j * np.pi * hz * s)
                       for s, left_db, right_db in DESK_ECHOES)

    near = filtered(x, reflections)
    tail = rng.standard_normal((2, SR // 4)) * burst(np.arange(SR // 4) / SR, .004, 0.077)
    tail = tail / np.linalg.norm(tail[0])
    dull = filtered(x, lambda hz: 1 / (1 + (hz / 5000) ** 2))
    return near + amp(-16) * signal.fftconvolve(dull, tail, axes=1)[:, :N]


THUD_LAG_S = .00006  # lumps land off to one side: the left port hears them this much later


def scene():
    """The chalk close under the phone, the room all around."""
    def lag(hz):
        """Half the lag on each side."""
        return np.exp(-1j * np.pi * hz * THUD_LAG_S * np.array([[1], [-1]]))

    chalk = ports(crumbling() + pops() + cracks() + ringing() + pressing(), tilt=0.66)
    lumps = filtered(ports(thuds(), tilt=0.74), lag)
    return echoed(chalk + lumps) + ports(room(), tilt=0.21)


TOP_HZ = 16900  # band limit of the phone


def record(dry):
    """The phone rolls off steeply around 16 kHz and keeps nothing above its band limit."""
    return filtered(dry, lambda hz: (hz < TOP_HZ) * along([(15900, 0.91), (16100, 0.02)], hz))


dry = scene()
out = record(dry)
int16_out(out)
```